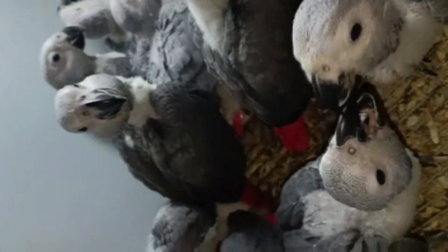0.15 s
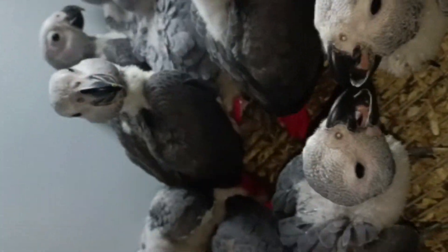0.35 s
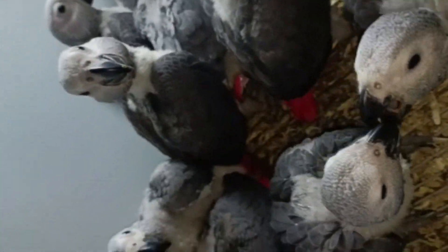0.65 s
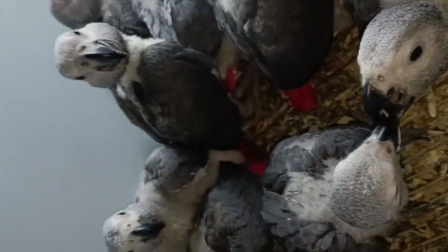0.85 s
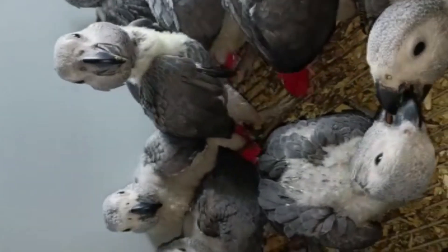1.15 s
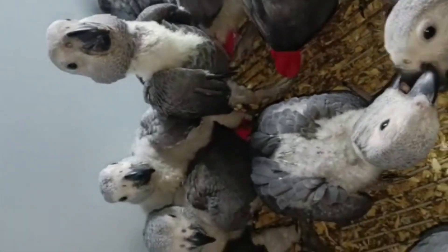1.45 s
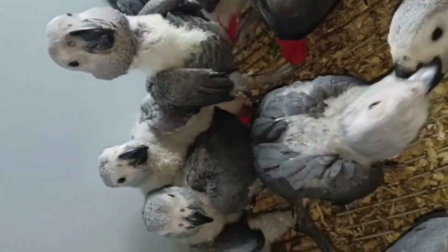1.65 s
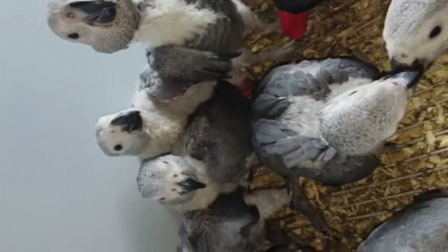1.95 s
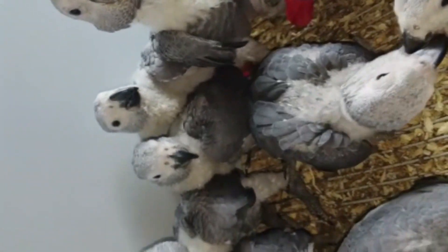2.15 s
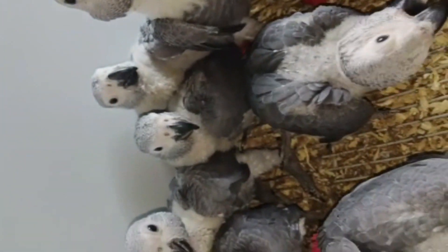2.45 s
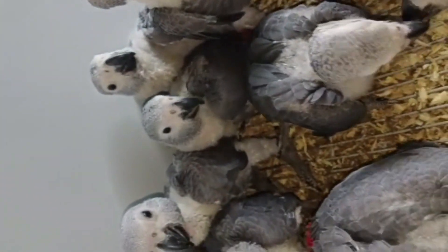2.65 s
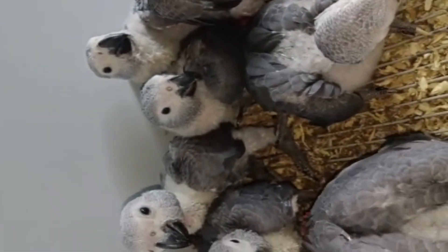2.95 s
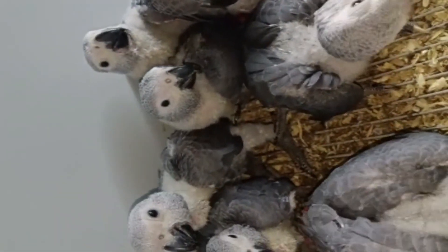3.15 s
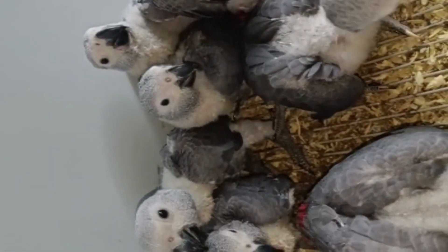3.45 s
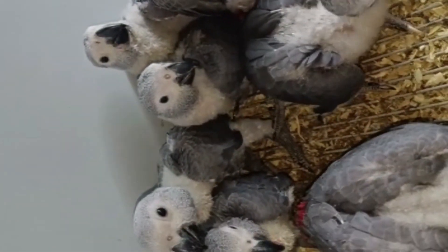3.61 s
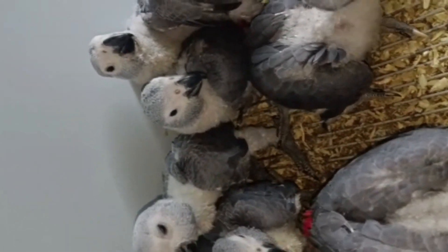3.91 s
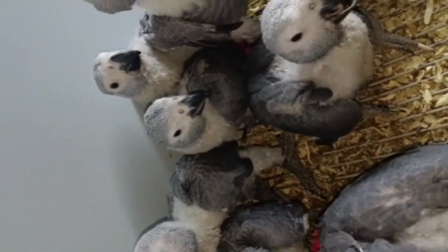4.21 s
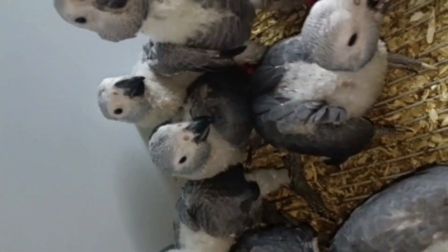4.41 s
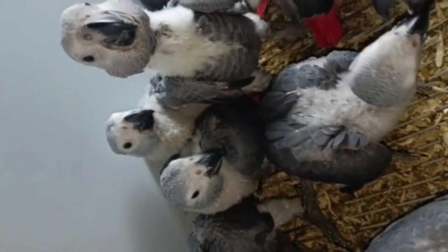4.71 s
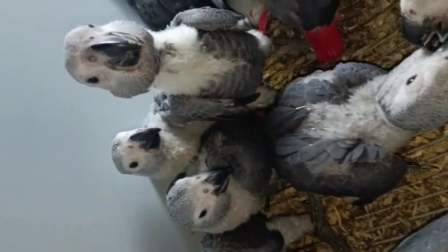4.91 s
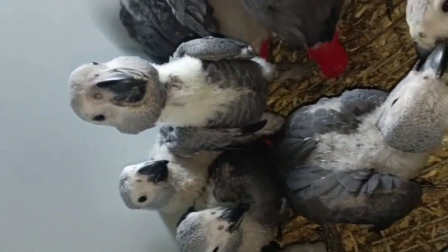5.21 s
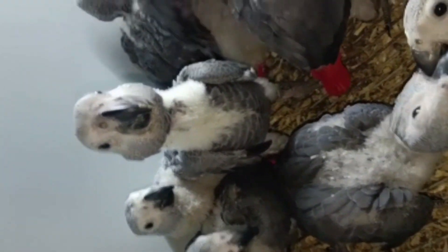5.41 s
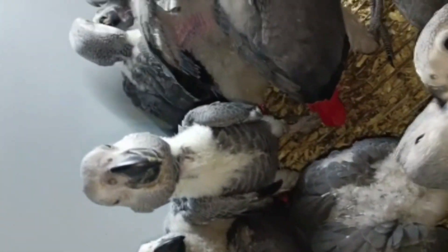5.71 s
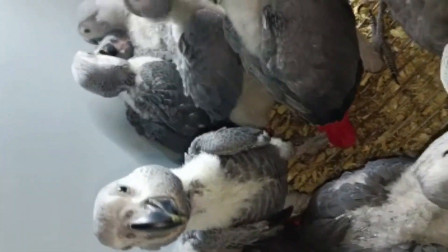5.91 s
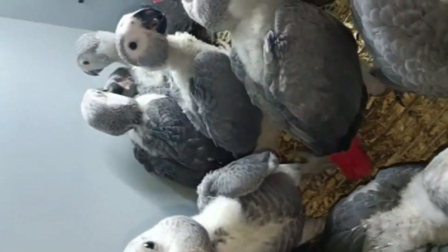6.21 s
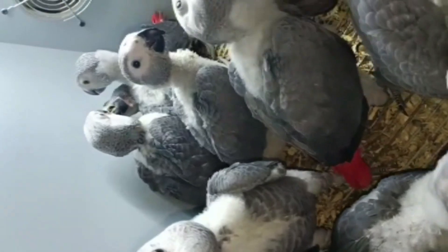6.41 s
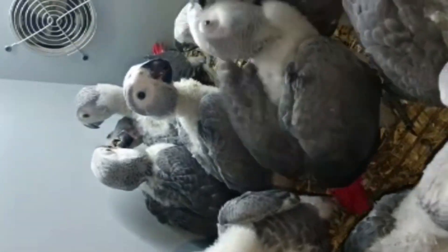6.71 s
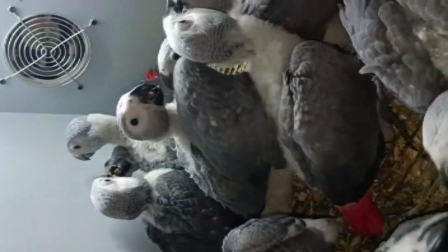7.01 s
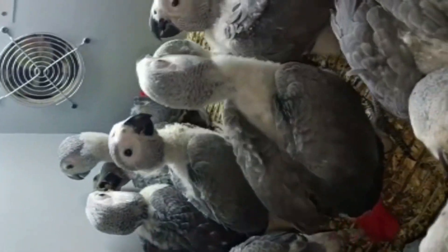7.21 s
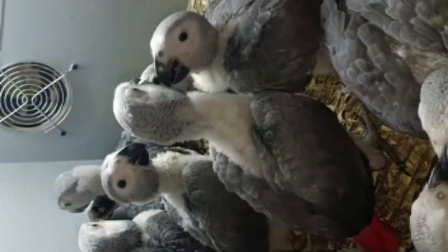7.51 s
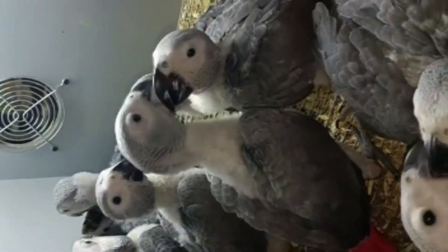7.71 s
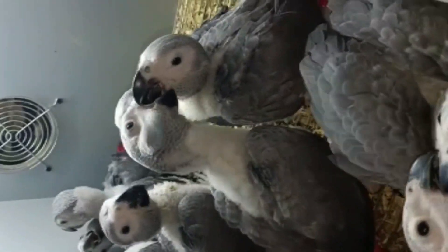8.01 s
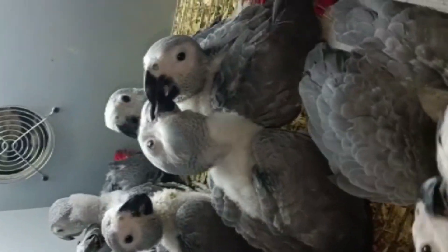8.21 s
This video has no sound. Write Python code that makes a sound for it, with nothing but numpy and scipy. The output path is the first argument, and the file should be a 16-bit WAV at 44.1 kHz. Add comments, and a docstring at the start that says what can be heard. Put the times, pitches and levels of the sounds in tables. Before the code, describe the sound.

Several young parrots beg close to the microphone inside a hard-walled brooder box. Their short, hoarse calls slide down in pitch and overlap in bursts about once a second, growing somewhat louder toward the end. After the first two bursts, a small beak click comes near the start of each one. A fan hums and blows steadily underneath, and dry bedding rustles faintly a couple of times.

```python
"""You hear young parrots begging in bursts of short, falling calls that overlap, over a humming fan.
Each call is a stack of overtones shaped by the throat, with a rasp of breath, and a thin, high sizzle
at 12-15 kHz pulses with it. One bird clicks its beak just before it starts. The fan blows in their
hard-walled brooder box, dry bedding rustles now and then, and two spaced microphones hear each bird
from its own side."""
import sys
import numpy as np
from scipy import signal
from scipy.io import wavfile
from scipy.ndimage import uniform_filter1d, minimum_filter1d

SR = 44100
rng = np.random.default_rng(int(sys.argv[2]) if len(sys.argv) > 2 else 0)


def transcribe(u):
    """Save the signal u as a 16-bit wav file named by the first command-line argument.

    u: samples, shape (n,) or (channels, n), limited to [-1, 1]; the rate is SR.
    q: integer samples, one column per channel.
    """
    v = np.clip(np.atleast_2d(u).T, -1, 1)
    q = np.round(v * 32767).astype(np.int16)
    wavfile.write(sys.argv[1], SR, q)


N = 368235

# The fan's rush of air, from bass to treble: frequency_hz, level_db
AIR_COLOUR = [(20, -44), (45, -36), (60, -31), (85, -12.5), (170, -10), (232, -6.5), (310, -16.5),
              (415, -28.5), (480, -24), (980, -38.5), (1310, -39), (2780, -40.5), (5000, -55), (9000, -67),
              (15000, -85)]
# Where the box rings along with that air: frequency_hz, width_hz, level_db
BOX_RINGS = [(1170, 25, -38.5), (1793, 230, -38.5), (2750, 110, -40.5), (3370, 320, -40.5)]
# How alike the air sounds left and right (1 is identical): frequency_hz, likeness
AIR_LIKENESS = [(60, 0.81), (180, 1), (540, 0.44), (1630, -0.16), (4890, -0.06), (14700, -0.11)]
# The fan's hum; close pairs of tones throb: multiple (of FAN_BEAT_HZ), level_db
FAN_TONES = [(6, -57), (25, -52), (26, -48), (30, -42.5), (31, -42.5), (37, -58), (38, -53), (39, -57),
             (44, -63)]
# The fan's loudness over time: time_s, level_db
FAN_LEVEL = [(0.0, -36.5), (2.37, -39), (8.3, -36), (8.35, -36.5)]
# How much louder the fan is on the left than on the right: time_s, pan_db
FAN_PAN = [(0.0, 2.5), (5.16, 3.5), (8.35, 0.41)]
# Rustles in the bedding: peak_time_s, level_db
RUSTLES = [(3.46, -54), (4.55, -66), (6.53, -47)]
# How long the box's echo takes to fade by 60 dB: frequency_hz, fade_s
BOX_FADE = [(400, 0.04), (1000, 0.37), (1800, 0.28), (3000, 0.3), (6000, 0.36), (12000, 0.05)]
# The notes a clicked beak rings with: pitch_hz, level_db, fade_s (to drop 60 dB)
BEAK_NOTES = [(660, -11, 0.024), (1325, -3.5, 0.01), (1804, -2.5, 0.025), (2700, -1, 0.0091),
              (3670, -4, 0.012), (4830, -14, .008)]
# Beak clicks: start_s, peak_db, pan_db
BEAK_CLICKS = [(2.524, -27, 14), (3.5876, -29, 7), (4.6763, -24.5, 6), (5.769, -20, 3.0), (6.699, -22, 9),
               (7.744, -20, -7.5)]
# How beak, box and microphone colour the voice: frequency_hz, level_db
VOICE_COLOUR = [(450, -14.5), (700, -9), (1000, -9.5), (1400, -3), (1800, 0.5), (2300, -9), (2800, -3),
                (3400, -4.5), (4200, -14), (5000, -14), (6000, -28), (7500, -35.5), (8500, -39),
                (11000, -54)]
# The begging calls, each a pair (settings, path).
# settings: pan_db, left_delay_ms, unevenness (0-1), treble_db_per_octave, start_boost_db, end_boost_db
#   (both for the lowest tone), throat_start_hz, throat_end_hz, rasp_db, sizzle_db
# path rows: time_s, pitch_hz, effort_db
CALLS = [ ((8, .09, 0, -4, 4, 8, 1450, 1450, -31, -50), [(0, 726, -38), (.03, 674, -57)]),
         ((5.5, -.48, .09, -12, -3, -5, 1250, 1650, -25, -39), [(.077, 852, -40), (.115, 812, -24),
         (.142, 773, -23), (.177, 655, -21), (.202, 613, -25), (.277, 598.5, -23.5), (.36, 581, -28)]),
         ((5.5, -.48, .2, -2, 0, 3, 1400, 1220, -24, -46), [(.366, 560, -30), (.397, 508.3, -31.5),
         (.474, 476.3, -32), (.509, 462, -40)]), ((9, .05, 0, -1.5, -10, -10, 2500, 2400, -34, -60),
         [(.506, 1397, -42), (.551, 1344, -26.5), (.594, 1147, -17), (.614, 1074, -22.5), (.673, 903, -23),
         (.703, 904, -32), (.731, 699, -24), (.788, 597, -35)]),
         ((-1, -.48, .24, -5, 2, 8, 1450, 2500, -27, -35), [(.801, 659, -21), (.821, 607, -26),
         (.863, 595, -20), (.888, 563, -23), (.938, 545, -30), (.98, 523, -27), (1.018, 513, -36)]),
         ((4.5, .07, 0, 3.5, 2, -7, 2600, 1650, -31, -45), [(.711, 1354, -33), (.791, 1331, -19),
         (.821, 1039, -16), (.873, 898, -21.5), (.9, 718, -21.5), (.96, 668, -21.5), (.998, 559, -28.5)]),
         ((7.5, -.5, .1, 1, 0, -5, 2000, 3400, -28, -45), [(1.499, 1099, -37), (1.522, 955, -16),
         (1.559, 873, -27.5), (1.586, 728, -23), (1.649, 630, -22.5)]),
         ((8, .017, .08, -2, 0, 6, 2200, 3500, -30, -44), [(1.646, 804, -14.5), (1.671, 685, -16.5),
         (1.689, 655, -18.5), (1.754, 601, -19), (1.786, 587.5, -21), (1.858, 514, -31)]),
         ((4, .05, 0, -2, -12, -12, 1750, 1750, -33, -50), [(1.58, 880, -30), (1.6, 875, -22),
         (1.632, 850, -27)]), ((2, -.52, 0, -3, 15, 20, 1000, 1000, -31, -50), [(1.551, 1310, -39),
         (1.591, 1495, -22), (1.639, 1333, -26)]), ((1, .042, 0, -5.5, -3, -5, 4830, 4900, -31, -50),
         [(1.646, 1177, -28), (1.661, 1059, -27), (1.689, 977, -18), (1.756, 912.5, -19),
         (1.779, 702, -18.5), (1.828, 640, -22)]), ((4.5, -.492, .05, -3, -13, 0, 2900, 2300, -30, -50),
         [(1.846, 733, -21), (1.871, 695, -21), (1.913, 675.5, -25), (1.943, 594, -31), (2.008, 504, -50)]),
         ((15.5, -.61, 0, -2, 0, 8, 2870, 2870, -31, -50), [(1.781, 1206, -26), (1.826, 1125, -34.5),
         (1.846, 1057, -36), (1.861, 954, -26), (1.898, 857, -37)]),
         ((6.5, 0, .04, -1.5, 12, 5, 1700, 2750, -30, -38), [(2.547, 773, -29), (2.569, 681, -20),
         (2.629, 648.6, -21.5), (2.664, 560.6, -21), (2.724, 560, -27), (2.761, 501, -24.5),
         (2.799, 479, -24)]), ((3, -.39, 0, 1.5, -15, -20, 1000, 1000, -31, -50), [(2.622, 982, -35),
         (2.641, 970, -22.5), (2.681, 883, -25), (2.716, 757, -21), (2.739, 750, -23.5)]),
         ((4.7, .07, .09, 3, -8, 4, 1050, 1400, -26, -44), [(2.651, 1395, -30), (2.711, 1070, -28),
         (2.726, 962.5, -23), (2.789, 825, -21), (2.819, 668, -23.5), (2.868, 615, -23),
         (2.898, 489, -32)]), ((5, -.314, .12, .5, -10, 2, 1620, 2300, -28, -41), [(2.741, 726, -20),
         (2.771, 683, -26), (2.844, 652.6, -20), (2.859, 624.5, -27), (2.978, 645, -27),
         (3.008, 590, -26.5), (3.045, 540, -33)]), ((7, -.418, 0, -2, -5, 0, 990, 1000, -31, -50),
         [(2.901, 727, -29.5), (2.938, 647, -30), (2.958, 586, -27)]),
         ((5.5, .02, .01, -.5, 6, 4, 1800, 1250, -31, -33), [(3.607, 848, -28.5), (3.632, 688.5, -18),
         (3.657, 707.6, -19.5), (3.707, 597, -18), (3.746, 559, -20), (3.781, 527, -23),
         (3.839, 507, -28.5)]), ((5.5, .23, .01, -2, -14, -5, 1070, 1070, -31, -50), [(3.672, 1664, -21),
         (3.719, 1447, -23), (3.741, 1051, -19), (3.804, 891, -14), (3.834, 752, -21), (3.861, 610, -17),
         (3.909, 550, -24.5)]), ((9, -.37, .01, -2.5, -10, -2, 3400, 2500, -31, -50), [(3.801, 1155, -20),
         (3.914, 916, -24.5), (3.939, 792, -33), (3.961, 714, -24.5), (3.988, 687, -21.5),
         (4.011, 633, -27.5), (4.043, 532, -40)]), ((3, .2, 0, -1, -5, 2, 2670, 2350, -31, -50),
         [(3.936, 995, -24.5), (3.971, 924, -33), (4.028, 910, -32)]),
         ((-2, -.15, .1, -2, 10, 11, 1070, 1070, -31, -50), [(4.141, 601, -50.5), (4.168, 563, -50.5),
         (4.218, 527, -57)]), ((6.5, .02, 0, 2, 7, 3, 2900, 1900, -28, -28), [(4.697, 826, -30.5),
         (4.712, 720.4, -23.5), (4.742, 724.5, -21), (4.787, 689, -19), (4.841, 592.3, -19.5),
         (4.935, 560, -21.5), (4.979, 509, -22)]), ((1.5, .21, .2, -5, -25, -3, 1140, 1140, -26, -45),
         [(4.762, 1207, -29), (4.782, 1357, -21), (4.839, 1383, -20), (4.859, 1318, -36)]),
         ((1.5, .21, .2, -1, -15, 5, 1050, 2100, -26, -40), [(4.876, 1085, -22), (4.901, 991, -17.5),
         (4.964, 862, -21), (4.986, 684, -21.5), (5.051, 636, -26), (5.088, 541, -23)]),
         ((8, -.48, 0, -3, -3, -1, 2400, 1300, -31, -45), [(4.872, 1310, -23), (4.889, 1190, -19.5),
         (4.926, 1083, -21.5), (4.951, 1068, -28), (5.006, 936, -23), (5.049, 830, -39)]),
         ((6, -.413, .14, 1, -2, -2, 2500, 1900, -28, -50), [(5.048, 640, -22), (5.068, 600, -19),
         (5.091, 622, -36), (5.158, 596, -38)]), ((-1, -.316, 0, -1, 15, 0, 2340, 2320, -31, -50),
         [(5.081, 1353, -21), (5.103, 1234, -27.5), (5.143, 1240, -32.5), (5.178, 1060, -46)]),
         ((-2, .83, 0, 1, 12, 18, 1070, 1070, -31, -50), [(5.231, 1032, -40), (5.263, 960, -39.5),
         (5.288, 900, -60)]), ((6.5, -.52, 0, 0, 3, 3, 2600, 1900, -34, -58), [(5.607, 1150, -52.5),
         (5.642, 1320, -31), (5.677, 1284, -28), (5.72, 1113, -21.5), (5.762, 1084, -22),
         (5.787, 1015, -23.5), (5.869, 852, -18.5)]), ((4, .137, .17, -2, 3, 4, 1400, 2150, -29, -36),
         [(5.787, 881, -27), (5.837, 782, -19.5), (5.872, 691, -22), (5.904, 666, -17), (5.924, 617, -14),
         (5.949, 579, -23), (6.039, 587, -26.5)]), ((2.5, .266, .03, 0, -9, 1, 1900, 1450, -31, -50),
         [(5.867, 1173, -21.5), (5.914, 932, -17), (5.959, 817.3, -16), (5.979, 686, -17),
         (6.019, 601, -22), (6.049, 531, -24)]), ((1, -.4, .17, -3, 3, -5, 1630, 1530, -27, -50),
         [(5.951, 688.4, -26), (5.991, 666, -26), (6.021, 630, -21), (6.036, 655, -30), (6.099, 639, -25.5),
         (6.134, 580, -38)]), ((2, -.6, 0, -2, -5, 5, 1000, 1000, -31, -50), [(6.031, 845, -29),
         (6.059, 810, -37), (6.074, 880, -33), (6.129, 845, -46)]),
         ((.5, -.501, 0, -1, 0, -12, 2400, 1750, -34, -55), [(6.59, 1164, -45), (6.615, 1250, -26.5),
         (6.64, 1266, -20.5), (6.752, 1048, -21), (6.787, 947, -19), (6.812, 940, -17), (6.839, 895, -16.5),
         (6.925, 860, -17)]), ((-1.5, .222, 0, -4, -3, 2, 1800, 3500, -31, -38), [(6.717, 870, -16),
         (6.74, 755, -11), (6.79, 683.5, -14.5), (6.824, 608, -15), (6.867, 600, -17), (6.924, 545, -13.5),
         (6.979, 531, -28)]), ((-3, .155, 0, 1, -10, -2, 1800, 1400, -31, -50), [(6.882, 1153, -25),
         (6.909, 1082, -24), (6.937, 925, -13.5), (6.969, 881, -16.4), (7.009, 657, -23.5),
         (7.084, 550.5, -24)]), ((-1.5, .5, 0, -4.5, -8, -8, 1900, 1700, -31, -42), [(7.012, 940, -34),
         (7.04, 910, -24), (7.065, 870, -18), (7.08, 820, -24)]),
         ((-1.5, -.57, .14, 1, 1, 1, 1900, 1950, -28, -36), [(7.767, 852, -20.5), (7.785, 727, -14),
         (7.807, 714.7, -10.5), (7.882, 642.7, -14.5), (7.92, 589.6, -17), (7.989, 597.4, -15),
         (8.019, 554, -14.5)]), ((-5.5, .64, 0, -1.5, -32, -25, 3200, 3300, -31, -50), [(7.842, 880, -15),
         (7.885, 810, -7), (7.917, 767, -28)]), ((-5.5, .64, 0, -1.5, -25, -12, 1300, 1300, -31, -50),
         [(7.922, 750, -25), (7.932, 704, -16.5), (7.959, 658, -19.7)]),
         ((-2, -.7, 0, -2, 2, -3, 1300, 1300, -31, -50), [(7.957, 1043, -23), (7.994, 919, -12.5),
         (8.029, 820, -18), (8.059, 699, -18), (8.099, 672.5, -24)]),
         ((4.5, -.54, .1, -2, -13, -7, 1720, 1620, -28, -50), [(7.962, 730, -22), (8.029, 693, -20.5),
         (8.059, 709, -19.5), (8.087, 665, -18.5), (8.151, 624, -23.5), (8.206, 631, -25),
         (8.236, 600, -29)]), ((-5, -.54, 0, 1, 5, 5, 1400, 1400, -31, -50), [(8.062, 948, -24.5),
         (8.117, 810, -29), (8.169, 652, -41)]), ((-8, -.54, 0, -1, 2, 3, 3200, 3220, -31, -50),
         [(8.082, 572, -36), (8.104, 551, -19), (8.127, 537, -24), (8.169, 515.6, -20.5)]), ]

FAN_BEAT_HZ = 7.658
CRACKLE_DB, RUSTLE_RISE_DB_PER_S, RUSTLE_FALL_DB_PER_S = -72, 260, 170
VOICE_TOP_HZ, TREBLE_CUT_HZ = 11000, 15250
RASP_HZ, SIZZLE_HZ = (3900, 7300), (12100, 14900)  # a rasp of breath; a thin, high sizzle
FLUTTER_DB, FLUTTER_HZ = 3.2, 12  # both flutter in loudness
# For each dB a bird eases off, its lowest tone stands out more, its overtones dull and the hiss fades.
SOFT_BOOST_DB, SOFT_DULL_DB_PER_OCTAVE, SOFT_HISS_DB = .4, .08, .5


def gain_of(db):
    """Turns decibels into a number to multiply by."""
    return 10 ** (np.asarray(db) / 20)


def unit_level(x):
    """Scales a signal to an average (rms) level of 1."""
    return x / np.sqrt(np.mean(x ** 2) + 1e-20)


def at_frequency(table, hz):
    """Looks up a value between a table's rows, with octaves evenly spaced."""
    row_hz, value = np.transpose(table)
    return np.interp(np.log(hz + 1), np.log(row_hz + 1), value)


def wobble(length, hz):
    """A smooth random drift that moves at up to about hz."""
    pole = np.exp(-2 * np.pi * hz / SR)
    drift = signal.lfilter([1], np.poly([pole, pole]), rng.standard_normal(length + 2000))
    return unit_level(drift[2000:])


def resonate(x, hz, width_hz):
    """Makes a sound ring around one frequency."""
    decay = np.exp(-np.pi * width_hz / SR)
    return 2 * signal.lfilter([1 - decay], [1, -decay * np.exp(2j * np.pi * hz / SR)], x).real


def band(x, edges_hz, order):
    """Keeps the sound between two frequencies, at level 1."""
    return unit_level(signal.sosfilt(signal.butter(order, edges_hz, "band", fs=SR, output="sos"), x))


def place(mix, start_s, sound, pan_db, left_delay_ms=0):
    """Adds a sound between the two microphones; positive pan_db is to the left."""
    for channel, side in zip(mix, (1, -1)):
        start = max(round((start_s + side * left_delay_ms / 2000) * SR), 0)
        part = channel[start:][:len(sound)]
        part += sound[:len(part)] * np.sqrt(2 / (1 + gain_of(-2 * side * pan_db)))


def fan_air():
    """Rushing air makes the box ring; its bass is much alike on both sides."""
    frames, hz = N // 512 + 5, np.fft.rfftfreq(2048, 1 / SR)
    noise = rng.standard_normal((frames, 1025, 5)).T
    left, unrelated = noise[0] + 1j * noise[1], noise[2] + 1j * noise[3]
    likeness = np.clip(at_frequency(AIR_LIKENESS, hz), -1, 1)[:, None]
    right = likeness * left + np.sqrt(1 - likeness ** 2) * unrelated
    drift_db = 1.6 * unit_level(uniform_filter1d(uniform_filter1d(noise[4], 20, axis=0), 6, axis=1))
    ringing = sum(gain_of(db) / (1 + (2 * (hz - centre) / width) ** 2) for centre, width, db in BOX_RINGS)
    colour = np.hypot(gain_of(at_frequency(AIR_COLOUR, hz)), ringing)[:, None] * gain_of(drift_db)
    _, air = signal.istft(np.array([left, right]) * colour, nperseg=2048, noverlap=1536)
    return unit_level(air[:, :N])


def fan():
    """The fan hums with slightly wavering tones on top of its rushing air."""
    air = fan_air()
    t = np.arange(N) / SR
    beats = FAN_BEAT_HZ * np.cumsum(1 + .0004 * wobble(N, .5)) / SR
    hum = sum(gain_of(db) * np.sqrt(2) * np.sin(2 * np.pi * (multiple * beats + rng.random()))
              for multiple, db in FAN_TONES)
    level = gain_of(np.interp(t, *np.transpose(FAN_LEVEL)))
    pan_db = np.interp(t, *np.transpose(FAN_PAN))
    return gain_of([pan_db / 2, -pan_db / 2]) * level * (gain_of(-2.5) * air + hum / np.mean(level))


def bedding():
    """Dry bedding makes many tiny, dull clicks: a faint crackle that swells into rustles."""
    t = np.arange(N) / SR
    ticks = gain_of(2.8 * np.minimum(rng.exponential(1, (2, N)), 5))
    ticks *= rng.random((2, N)) < 1500 / SR  # about 1500 a second
    ticks *= rng.choice([-1, 1], (2, N))
    crackle = resonate(ticks, 620, 900) + gain_of(-25) * resonate(ticks, 2500, 2100)
    crackle += gain_of(-39.5) * resonate(ticks, 5000, 2500)
    swells_db = [db - np.maximum((peak_s - t) * RUSTLE_RISE_DB_PER_S, (t - peak_s) * RUSTLE_FALL_DB_PER_S)
                 for peak_s, db in RUSTLES]
    return gain_of(np.maximum(np.max(swells_db, axis=0), CRACKLE_DB)) * unit_level(crackle)


def box_echo(x):
    """Sound bounces off the hard walls, differently for each side; each band fades at its own speed."""
    bounces = np.zeros((2, SR // 2))
    slots = np.arange(80, SR // 2 - 20, 20)
    arrivals = slots + rng.integers(0, 20, (2, len(slots)))
    np.put_along_axis(bounces, arrivals, rng.choice([-1., 1.], arrivals.shape), 1)
    hz, t, spectrum = signal.stft(bounces, SR, nperseg=128)
    fade = gain_of(-60 * t / at_frequency(BOX_FADE, hz)[:, None])
    _, tail = signal.istft(spectrum * fade, SR, nperseg=128)
    return signal.fftconvolve(x, tail / np.linalg.norm(tail[0]), axes=1)[:, :N]


def beak_click():
    """A beak snaps and rings very briefly."""
    t = np.arange(1500) / SR
    click = sum(gain_of(db - 60 * t / fade_s) * np.sin(2 * np.pi * hz * t) for hz, db, fade_s in BEAK_NOTES)
    click *= 1 - np.exp(-t / .00049)
    return click / abs(click).max()


def waver_db(tone_hz):
    """Head and tongue never rest, so each overtone swells and dips, the treble most."""
    noise = rng.standard_normal(tone_hz.shape)
    separate = unit_level(uniform_filter1d(uniform_filter1d(noise, size=20), size=20))
    together = unit_level(uniform_filter1d(rng.standard_normal(tone_hz.shape[1]), size=30))
    return 3.2 * separate + 2.2 * together * np.clip(tone_hz / 6000 - 1, 0, 1)


def rasp_and_sizzle(cycles, eased_db, rasp_db, sizzle_db):
    """A rasp of breath, and a thin, high sizzle at 12-15 kHz that pulses with each call."""
    pulses = rng.standard_normal(len(cycles)) * (1 + np.cos(2 * np.pi * cycles))
    hiss = 0
    for level_db, edges_hz, order in (rasp_db, RASP_HZ, 3), (sizzle_db, SIZZLE_HZ, 4):
        flutter_db = FLUTTER_DB * wobble(len(cycles), FLUTTER_HZ)
        hiss += gain_of(level_db + flutter_db - SOFT_HISS_DB * eased_db) * band(pulses, edges_hz, order)
    return hiss


def begging_call(path, unevenness, treble_db_per_octave, start_boost_db, end_boost_db,
                 throat_start_hz, throat_end_hz, rasp_db, sizzle_db):
    """One hoarse call: tones at multiples of a sliding pitch, lifted where the throat rings."""
    time_s, pitch_hz, effort_db = np.transpose(path)
    t = np.arange(time_s[0] - .004, time_s[-1] + .0065, 1 / SR)
    n, step = len(t), 32  # colour changes slowly, so it is worked out once a step
    hz = np.interp(t, time_s, pitch_hz)
    eased_db = np.interp(t, time_s, effort_db.max() - effort_db)
    cycles = np.cumsum(hz * (1 + .0052 * wobble(n, 34.8) + .0068 * wobble(n, 200))) / SR
    multiple = np.arange(1, VOICE_TOP_HZ // hz.min() + 1)[:, None]

    tone_hz = multiple * hz[::step]
    throat_hz = np.geomspace(throat_start_hz, throat_end_hz, n)[::step]
    tone_db = at_frequency(VOICE_COLOUR, tone_hz)
    tone_db += 14 / (1 + ((tone_hz - throat_hz) / (.11 * throat_hz)) ** 2)
    tone_db += treble_db_per_octave * np.log2(np.clip(tone_hz / 2600, 1, 3.5))
    tone_db -= SOFT_DULL_DB_PER_OCTAVE * eased_db[::step] * np.log2(np.maximum(multiple / 2, 1))
    tone_db[0] += (np.linspace(start_boost_db, end_boost_db, n) + SOFT_BOOST_DB * eased_db)[::step]
    tone_db[1:] += waver_db(tone_hz)[1:]
    strength = gain_of(tone_db) * (tone_hz < VOICE_TOP_HZ)
    strength /= np.sqrt((strength ** 2).sum(0) / 2)
    offsets = .3 * rng.random(multiple.shape)  # nearly lined up: one pulse a cycle
    tones = np.repeat(strength, step, axis=1)[:, :n] * np.cos(2 * np.pi * (multiple * cycles + offsets))

    # The higher the overtone, the hoarser it is.
    voice = tones[0] + tones[1] * (1 + .07 * wobble(n, 300))
    voice += tones[2:5].sum(0) * (1 + .25 * wobble(n, 450))
    voice += tones[5:].sum(0) * (1 + .3 * wobble(n, 450))
    voice += rasp_and_sizzle(cycles, eased_db, rasp_db, sizzle_db)
    # At low pitch every second cycle weakens, which adds tones halfway between the others.
    lowness = np.clip((660 - hz) / 40, 0, 1)
    voice *= 1 + unevenness ** .5 * lowness * np.cos(np.pi * cycles)
    voice *= 1 + .12 * wobble(n, 45)  # the loudness trembles
    effort = np.interp(t, time_s, gain_of(effort_db) ** 2) ** .5  # stays strong, then stops short
    return t[0], effort * voice * signal.windows.tukey(n, .0069 / (t[-1] - t[0]))


def parrots():
    """All calls and clicks. Long, low waves fill the box and reach both microphones almost together."""
    highs, lows = np.zeros((2, N)), np.zeros((2, N))
    for (pan_db, left_delay_ms, *voice_settings), path in CALLS:
        start_s, voice = begging_call(path, *voice_settings)
        place(highs, start_s, voice, pan_db, left_delay_ms)
        place(lows, start_s, voice, pan_db, .4 * left_delay_ms)
    keep_lows = signal.firwin(255, 950, fs=SR)[None]
    mix = highs + signal.oaconvolve(lows - highs, keep_lows, "same")  # lows take over below 950 Hz
    for start_s, peak_db, pan_db in BEAK_CLICKS:
        place(mix, start_s, gain_of(peak_db) * beak_click(), pan_db)
    return mix


def scene():
    """Parrots and bedding echo in the box, over the fan."""
    direct = parrots() + bedding()
    return gain_of(-.5) * direct + gain_of(-14) * box_echo(direct) + fan()


def record(dry):
    """Turns down the loudest peaks, then cuts the highest treble."""
    safe_gain = np.minimum(.9 / (abs(dry).max(0) + 1e-9), 1)
    smooth_gain = uniform_filter1d(minimum_filter1d(safe_gain, size=301), size=301)
    treble_cut = signal.firwin(511, TREBLE_CUT_HZ, window=("kaiser", 9), fs=SR)[None]
    return signal.oaconvolve(dry * smooth_gain, treble_cut, "same")


dry = scene()
out = record(dry)
transcribe(out)
```